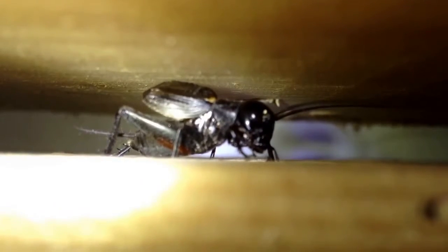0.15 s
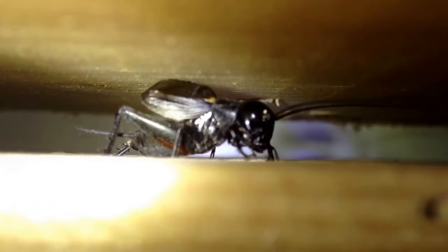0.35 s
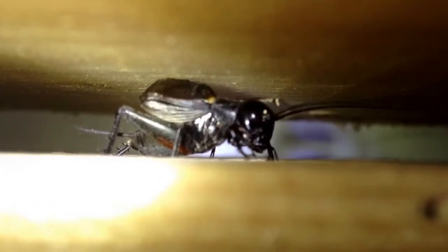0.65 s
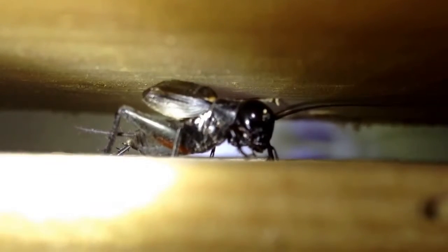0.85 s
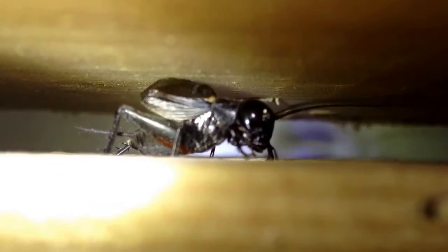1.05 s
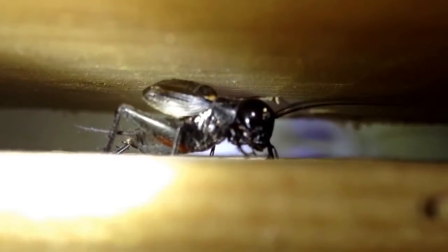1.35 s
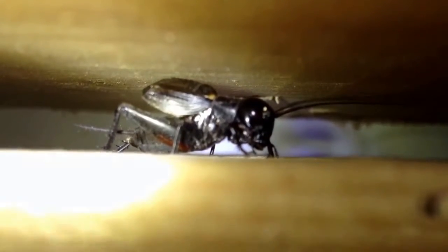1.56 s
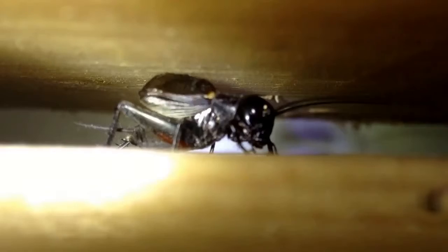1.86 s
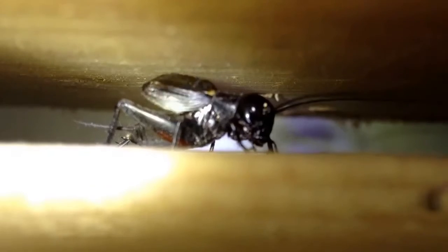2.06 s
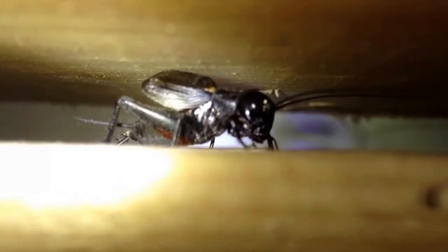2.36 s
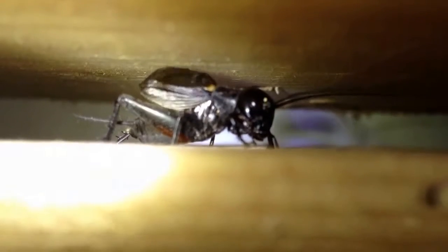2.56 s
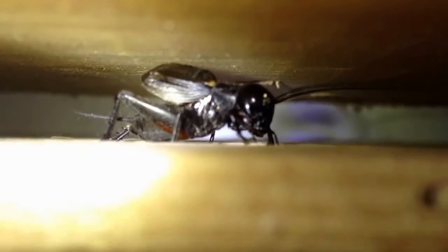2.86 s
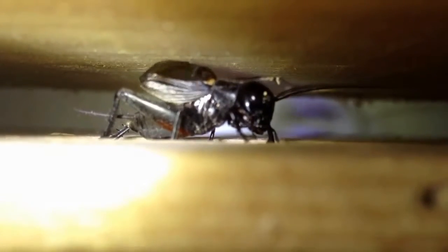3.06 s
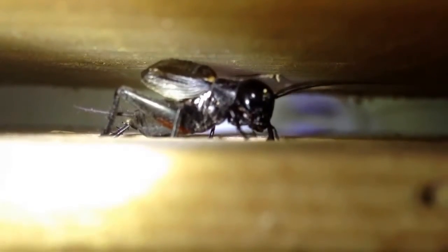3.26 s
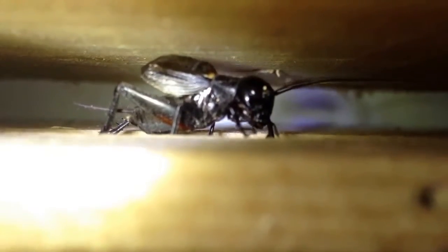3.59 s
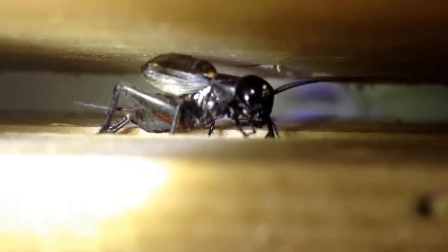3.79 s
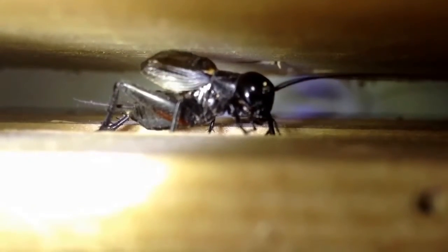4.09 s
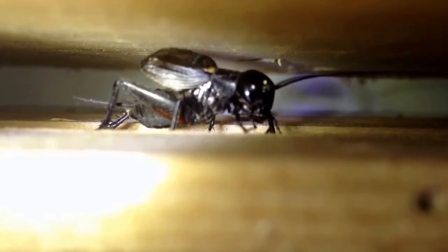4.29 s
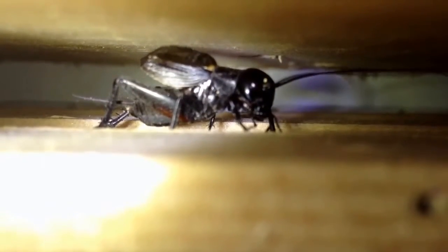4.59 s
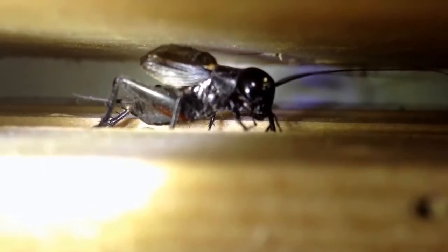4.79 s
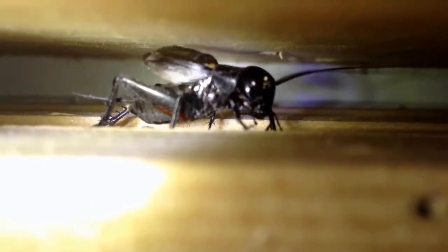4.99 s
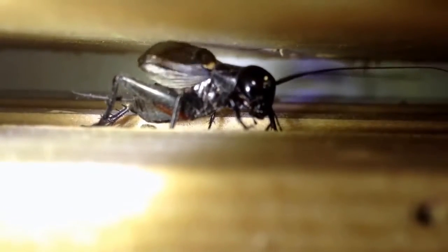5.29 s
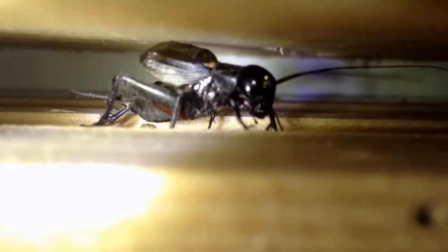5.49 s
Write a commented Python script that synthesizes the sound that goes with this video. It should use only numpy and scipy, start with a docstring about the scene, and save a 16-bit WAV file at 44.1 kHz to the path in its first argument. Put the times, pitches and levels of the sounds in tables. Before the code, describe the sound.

A cricket close by gives thin, high, separate chirps on a quiet night, with faint rustles and dull wooden knocks around it.

```python
"""A field cricket sings in the gap between two wooden boards on a quiet night, over a faint filtered-noise hush.
From the start it chirps: a light brush of the wings, an opening stroke, one full stroke (two in the fourth
chirp); each stroke is a tone near 4.9 kHz that sags as the wings slow. Soft noise rustles come in the first
half second, then now and then; a low drone swells at 1.4 s and 4.4 s. Dull knocks and soft rubs ring wood modes
from 1.6 s, grainy noise crackles from 2.5 s; the hardest knock falls at 5.14 s, before the last chirp."""
import sys
import numpy as np
from scipy import signal
from scipy.fft import rfft, irfft, next_fast_len
from scipy.io import wavfile
from scipy.ndimage import uniform_filter1d

SR = 44100
rng = np.random.default_rng(int(sys.argv[2]) if len(sys.argv) > 2 else 0)


def digitize_waveform(pressure):
    """Quantize a signal to 16-bit integers and store it at the path in sys.argv[1].

    Rows of a 2-D input are taken as channels; values are limited to [-1, 1].
    """
    field = np.atleast_2d(pressure).T
    bounded = np.clip(field, -1, 1)
    quanta = np.round(bounded * 32767).astype(np.int16)
    wavfile.write(sys.argv[1], SR, quanta)


N = 248724

# still air and hiss, relative spectrum: f/Hz, density/dB
HUSH_COLOUR = [(30, -33), (50, -21), (80, -10.5), (130, -2), (230, 1.5), (400, -5), (700, -6), (1100, -8.5),
               (2200, -11), (4000, -11.5), (4750, -6.5), (5500, -12.5), (7600, -15.5), (9800, -24),
               (12000, -17.5), (14800, -14.5)]
# low drone: peak t/s, level/dB, rise/s, fade/s
DRONE_SWELLS = [(1.42, -68, 0.21, 0.39), (4.42, -68.5, 0.2, 0.68)]
# soft rustles: peak t/s, body level/dB, rise/s, fade/s, relative brightness/dB
RUSTLES = [(.11, -69, 0.13, 0.13, 0), (.258, -55.5, 0.019, 0.067, -8), (.37, -59.5, 0.011, 0.096, -10),
           (.422, -58, .024, 0.048, 0.5), (1.18, -63.5, 0.13, 0.12, -1), (1.805, -67, 0.016, .06, -5.5),
           (2.457, -60.5, 0.011, 0.077, -5.5), (3.385, -65.5, 0.016, 0.24, -2.5),
           (3.52, -71, 0.026, 0.046, 1)]
# relative spectra of the rustles' body and bright edge: f/Hz, density/dB
RUSTLE_BODY_COLOUR = [(40, -50), (100, -24), (200, -2), (520, 3), (800, 0), (1400, -0.5), (1800, 1.5),
                      (2300, -5.5), (3000, -15.5), (6000, -51)]
RUSTLE_EDGE_COLOUR = [(100, -53), (1500, -14), (2500, 1), (3600, 0), (5000, -5), (7500, -18), (10000, -39)]
# small dry crackles: t/s, relative level/dB, length (to 1/e)/s
CRACKLES = [(2.486, -67.5, 0.05), (2.813, -64.5, 0.019), (2.94, -69, 0.16), (3.64, -66, 0.031),
            (3.67, -66, 0.098), (3.782, -57, 0.011), (3.809, -62, 0.002), (3.832, -66.5, 0.0041),
            (3.88, -71.5, .02), (4.844, -69, 0.019)]
# relative spectrum of the crackles: f/Hz, density/dB
CRACKLE_COLOUR = [(1000, -9.5), (3500, -3.5), (6200, 3), (8000, -2), (10000, -7.5), (12000, -7),
                  (13500, 4.5), (15500, -4)]
# knocks and soft rubs on wood: t/s, peak level before the low cut/dB, centre of the contact's spectrum f/Hz,
# contact length (to 1/e)/s
WOOD_CONTACTS = [(1.63, -55.5, 129, 0.0053), (1.868, -50.5, 198, .0043), (2.819, -49.5, 211, 0.0016),
                 (2.951, -55, 226, 0.013), (2.989, -52, 190, 0.011), (3.016, -56.5, 204, 0.013),
                 (3.38, -50, 505, 0.03), (3.51, -50.5, 396, .024), (3.744, -56.5, 193, 0.015),
                 (3.801, -49, 230, 0.011), (3.92, -52, 450, 0.0015), (4.869, -49.5, 268, 0.0021),
                 (5.141, -36.5, 1880, 0.014), (5.144, -32, 324, 0.0056), (5.153, -40, 185, 0.027),
                 (5.213, -48.5, 277, 0.015), (5.246, -44.5, 236, 0.0015), (5.287, -42, 250, 0.0012)]
# modes of the wood: f/Hz, relative level/dB, t60/s
WOOD_MODES = [(99, -23, 0.24), (173.4, -3.5, 0.12), (206, -0.5, 0.079), (260.6, -5.5, 0.05),
              (320, 0.5, 0.048), (446, -2.5, 0.05), (528, -1, 0.048), (740, 10.5, 0.0085),
              (974, 4.5, 0.016), (1420, 1.5, 0.018), (1750, 6, 0.012), (2370, 5, 0.0037), (3080, 3, 0.0022),
              (4150, 18.5, 0.0047)]
# chirps: first full stroke t/s, its level/dB, its starting pitch f/Hz, vigour/0-1,
# slip of the opening stroke/0-1, relative brush level/dB, full strokes/count
CHIRPS = [(.082, -31.7, 4927, .25, .2, -57.5, 1), (.521, -32.2, 4887, .1, .3, -62, 1),
          (.864, -32, 4931, .5, .1, -59, 1), (1.2486, -32.4, 4915, .3, 1, -61, 2),
          (1.9963, -32.1, 4885, 0, .8, -60, 1), (2.3209, -31.5, 4930, .35, 0, -59, 1),
          (2.7283, -31.5, 4916, .15, 0, -58, 1), (3.2616, -31.3, 4880, 0, .2, -58, 1),
          (3.5739, -31.5, 4930, .85, .55, -63, 1), (4.0249, -31.5, 4920, 1, .2, -55.5, 1),
          (4.3397, -31.5, 4925, 1, .1, -52.5, 1), (5.1049, -30.8, 4918, .7, .7, -53.5, 1),
          (5.5086, -30.3, 4914, .75, 0, -52.5, 1)]
# how well the wings radiate overtones: f/Hz, relative level/dB
OVERTONE_RADIATION = [(9000, 7), (9380, -0.5), (9540, -4), (9700, -1), (9840, 4.5), (13800, -2),
                      (14300, -7), (14580, -12), (14760, -1)]
# wing resonances stirred by skipping teeth: f/Hz, width/Hz, relative level/dB
WING_MODES = [(4380, 306, 6.5), (4346, 120, 3.5), (5200, 400, -4), (5540, 105, 0.5), (6010, 740, 0),
              (6750, 1000, -8.5), (7950, 620, -10), (11700, 6200, -21)]
# reflections from the boards and walls around: delay t/s, level/dB
NEAR_ECHOES = [(0.005318, -12.7), (0.007234, -18.5), (0.010455, -17.3), (0.013529, -22.4), (0.01676, -20.5),
               (0.019509, -21.6), (0.025023, -22.0)]
# later reflections: delay t/s, level/dB
FAR_ECHOES = [(.0345, -21), (.0745, -30), (.0965, -30.5)]

HUSH_DB = -65.5
CUTOFF_HZ = 15350
# chirp timing; leads count back from the first full stroke, vigour hurries the opening
BRUSH_LEAD_S, OPENING_LEAD_S, HURRY_S, REPEAT_S = .0655, .0393, .0021, .0467
# full stroke: vigour draws it out and makes it swell
FULL_S, FULL_STRETCH_S, FULL_END_HZ = .018, .0014, 4555
FULL_SWELL_DB, VIGOUR_SWELL_DB, FULL_RASP_DB = -1, 8.5, -24
# opening stroke: softer, lower, raspier
OPENING_S, OPENING_DB, OPENING_SWELL_DB, OPENING_RASP_DB = .017, -2.5, -2, -17
OPENING_HZ, OPENING_END_HZ = 4832, 4555
# changes to the opening stroke at full slip of the scraper
SLIP_DB, SLIP_SWELL_DB, SLIP_RASP_DB = -2, 2, 5.5
SLIP_FLAT_HZ, SLIP_SAG_HZ = 45, 171
# shares of a stroke
ATTACK_SHARE, RELEASE_SHARE = .58, .14
SQUEAK_AT_SHARE, SQUEAK_WIDTH_SHARE, CATCH_WIDTH_SHARE = .16, .13, .22
SAG_POWER = 4.45  # higher: the pitch sags later
BRIGHTEN_DB_PER_S = .72  # overtones gain over the song


def from_db(db):
    """Amplitude ratio of a level in dB."""
    return 10 ** (np.asarray(db) / 20)


def rms_one(x):
    """Scale to rms 1."""
    return x / np.sqrt(np.mean(x ** 2) + 1e-20)


def at_hz(points, hz):
    """Read a spectrum on a log-frequency axis."""
    f, db = np.transpose(points)
    return np.interp(np.log(np.maximum(hz, 1)), np.log(f), db)


def add(out, t_s, sound):
    """Mix a sound in from time t_s."""
    i = int(np.clip(round(t_s * SR), 0, N))
    out[i:i + len(sound)] += sound[:N - i]


def noise(colour):
    """Steady noise with the given spectrum; rms 1."""
    gain = from_db(at_hz(colour, np.fft.rfftfreq(N, 1 / SR)))
    return rms_one(irfft(rfft(rng.standard_normal(N)) * gain, N))


def grain(depth_db, size):
    """Random gain from noise smoothed over size samples; rms 1."""
    smoothed = uniform_filter1d(rng.standard_normal(N), size=size)
    return rms_one(from_db(depth_db * rms_one(smoothed)))


def resonate(x, hz, width_hz):
    """A two-pole resonance with gain 1 on top."""
    r = np.exp(-np.pi * width_hz / SR)
    b = np.array([1, 0, -1]) * (1 - r * r) / 2
    a = [1, -2 * r * np.cos(2 * np.pi * hz / SR), r * r]
    return signal.lfilter(b, a, x + 1e-18)


def swell(peak_s, rise_s, fade_s):
    """Gain in time: a rounded rise to 1 at the peak, then an exponential decay."""
    t = np.arange(N) / SR - peak_s
    rise = np.sin(np.pi / 2 * np.clip(1 + t / rise_s, 0, 1))
    return rise * np.exp(-np.maximum(t, 0) / fade_s)


def background(drone_hz=315, drone_width_hz=110):
    """An even hush of coloured noise, and a faint hollow drone of twice-resonated noise."""
    drone = rng.standard_normal(N)
    for _ in range(2):
        drone = resonate(drone, drone_hz, drone_width_hz)
    level = sum(from_db(db) * swell(s, rise_s, fade_s) for s, db, rise_s, fade_s in DRONE_SWELLS)
    return from_db(HUSH_DB) * noise(HUSH_COLOUR) + level * rms_one(drone)


def rustles(edge_db=1, grain_db=1.0):
    """Something soft slides over a surface in short strokes, gripping unevenly."""
    body, edge = 0, 0
    for s, db, rise_s, fade_s, bright_db in RUSTLES:
        slide = from_db(db) * swell(s, rise_s, fade_s)
        body = np.hypot(body, slide)
        edge = np.hypot(edge, slide * from_db(bright_db + edge_db))
    grip = grain(grain_db, size=200)
    return grip * (body * noise(RUSTLE_BODY_COLOUR) + edge * noise(RUSTLE_EDGE_COLOUR))


def crackles(grain_db=4, gain_db=3.5):
    """Short bursts of fine, bright grains: coloured noise with a fast random gain."""
    bursts, t = np.zeros(N), np.arange(SR // 4) / SR
    for s, db, length_s in CRACKLES:
        add(bursts, s, from_db(db) * np.exp(-(t / length_s) ** 2))
    return from_db(gain_db) * bursts * grain(grain_db, size=50) * noise(CRACKLE_COLOUR)


def wood_contacts(scuff=0.26, spread=0.56, low_cut_hz=90):
    """Knocks and soft rubs, scuffing as they touch, set the decaying modes of the wood ringing."""
    out, t = np.zeros(N), np.arange(SR // 4) / SR
    body = sum(from_db(db - 60 * t / t60_s) * np.cos(2 * np.pi * hz * t) for hz, db, t60_s in WOOD_MODES)
    for s, db, centre_hz, length_s in WOOD_CONTACTS:
        scuffing = scuff * rng.standard_normal(len(t)) * np.exp(-t / length_s)
        contact = resonate((t == 0) + scuffing, centre_hz, spread * centre_hz)
        ringing = signal.fftconvolve(contact, body)[:len(t)]
        add(out, s, from_db(db) * ringing / np.abs(ringing).max())
    return signal.sosfilt(signal.butter(2, low_cut_hz, "high", fs=SR, output="sos"), out)


def wing_rasp(impacts_per_s=4500):
    """Irregular tooth impacts ringing the resonances of both wings; rms 1."""
    impacts = rng.standard_normal(N) * (rng.random(N) < impacts_per_s / SR)
    rasp = np.zeros(N)
    for k, (hz, width_hz, db) in enumerate(WING_MODES):
        first_wing = resonate(np.roll(impacts, 97 * k), hz, width_hz)
        rasp += from_db(db) * resonate(first_wing, hz, width_hz)
    return rms_one(rasp)


def wing_brushes(length_s=0.015, pitch_hz=4540, rasp_db=-1.0, tone_db=-6):
    """A glancing touch of the wings opens each chirp: a short, low, scratchy note."""
    touches, touch = np.zeros(N), np.hanning(int(length_s * SR))
    for s, _, _, _, _, brush_db, _ in CHIRPS:
        add(touches, s - BRUSH_LEAD_S - length_s / 2, from_db(brush_db) * touch)
    tone = np.sin(2 * np.pi * pitch_hz * np.arange(N) / SR)
    return touches * (from_db(tone_db) * tone + from_db(rasp_db) * wing_rasp())


def scraper_force(u):
    """Attack, hold and release along a stroke (u from 0 to 1)."""
    ramp = np.minimum(u / ATTACK_SHARE, (1 - u) / RELEASE_SHARE)
    return np.sin(np.pi / 2 * np.clip(ramp, 0, 1))


def strokes():
    """All strokes as rows: t/s, length/s, level/dB, start f/Hz, end f/Hz, swell/dB, rasp/dB."""
    rows = []
    for s, db, hz, vigour, slip, _, count in CHIRPS:
        rows.append((s - OPENING_LEAD_S + HURRY_S * vigour, OPENING_S, db + OPENING_DB + SLIP_DB * slip,
                     OPENING_HZ - SLIP_FLAT_HZ * slip, OPENING_END_HZ - SLIP_SAG_HZ * slip,
                     OPENING_SWELL_DB + SLIP_SWELL_DB * slip, OPENING_RASP_DB + SLIP_RASP_DB * slip))
        for k in range(count):
            rows.append((s + k * REPEAT_S, FULL_S + FULL_STRETCH_S * vigour, db, hz, FULL_END_HZ,
                         FULL_SWELL_DB + VIGOUR_SWELL_DB * vigour, FULL_RASP_DB))
    return rows


def wing_strokes(flutter=0.019, catch_at=0.029, catch_db=-3, scrape_db=-22, overtone_db=-27.0,
                 linger_s=0.014, linger_db=-4):
    """The scraper runs down the file, one tooth a cycle, and slows towards the end."""
    tone, scrape = np.zeros(N), np.zeros(N)
    unevenness = 1 + flutter * rms_one(resonate(rng.standard_normal(N), 320, 340))
    for s, length_s, db, start_hz, end_hz, swell_db, rasp_db in strokes():
        u = np.linspace(0, 1, int(length_s * SR))
        hz = start_hz + (end_hz - start_hz) * u ** SAG_POWER
        phase = 2 * np.pi * np.cumsum(hz) / SR
        force = scraper_force(u) * from_db(db + swell_db * (u - .5))
        overtones = sum(from_db(at_hz(OVERTONE_RADIATION, k * hz)) * np.sin(k * phase) for k in (2, 3))
        overtone_gain = from_db(overtone_db + BRIGHTEN_DB_PER_S * s)
        add(tone, s, force * (np.sin(phase) + overtone_gain * overtones))
        # the teeth rasp as they meet, before they lock to the wing's own pitch
        catch = np.exp(-((u - .5 - catch_at) / CATCH_WIDTH_SHARE) ** 2)
        add(scrape, s - length_s / 2, from_db(db + rasp_db + catch_db) * catch)
        # every second tooth briefly bites harder: a squeak a fifth above the tone
        bite = np.exp(-((u - SQUEAK_AT_SHARE) / SQUEAK_WIDTH_SHARE) ** 2)
        add(tone, s, from_db(db + rasp_db) * np.sin(1.5 * phase) * bite)
        # the rasp grows again as the slowing scraper loses its grip
        add(scrape, s, force * from_db(scrape_db) * (.5 + u) / 2)
    # scattered between the boards, the rasp outlasts the stroke a little
    keep = np.exp(-1 / (linger_s * SR))
    lingering_power = signal.lfilter([1 - keep], [1, -keep], scrape ** 2 + 1e-18)
    scattered = from_db(linger_db) * np.sqrt(lingering_power)
    return tone * unevenness + np.hypot(scrape, scattered) * wing_rasp()


def surroundings(x, tail_db=-26, t60_s=0.5, build_up_s=0.046, ring_hz=4900, ring_width_hz=170, broad_db=-11):
    """Near echoes beat against the falling tone; mostly the band near 4.9 kHz carries further and dies away."""
    t, size = np.arange(SR) / SR, next_fast_len(N + SR)
    hz = np.fft.rfftfreq(size, 1 / SR)

    def echo_response(table):
        """Spectrum of a set of delayed copies."""
        return sum(from_db(db) * np.exp(-2j * np.pi * hz * delay_s) for delay_s, db in table)

    tail = rng.standard_normal(SR) * from_db(-60 * t / t60_s) * (1 - np.exp(-t / build_up_s))
    tail *= from_db(tail_db) / np.linalg.norm(tail)
    carried = resonate(x, ring_hz, ring_width_hz) + from_db(broad_db) * x
    near = rfft(x, size) * echo_response(NEAR_ECHOES)
    far = rfft(carried, size) * (echo_response(FAR_ECHOES) + rfft(tail, size))
    return x + irfft(near + far, size)[:N]


def scene():
    """The cricket close up, with the small noises around it."""
    around = background() + rustles() + crackles() + wood_contacts()
    cricket = surroundings(wing_brushes() + wing_strokes())
    return (around + cricket)[None]


def record(dry):
    """The top is cut steeply."""
    return signal.sosfilt(signal.ellip(12, .1, 70, CUTOFF_HZ, fs=SR, output="sos"), dry)


dry = scene()
out = record(dry)
digitize_waveform(out)
```